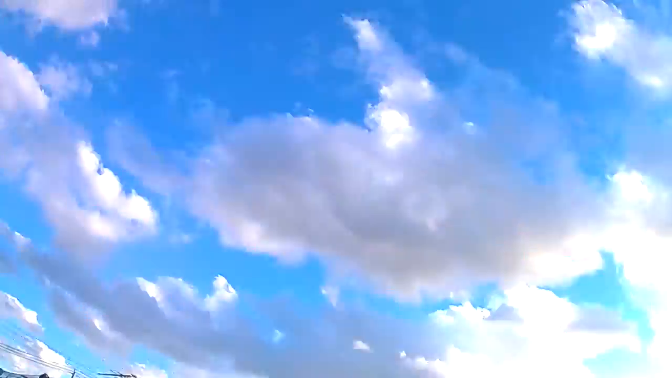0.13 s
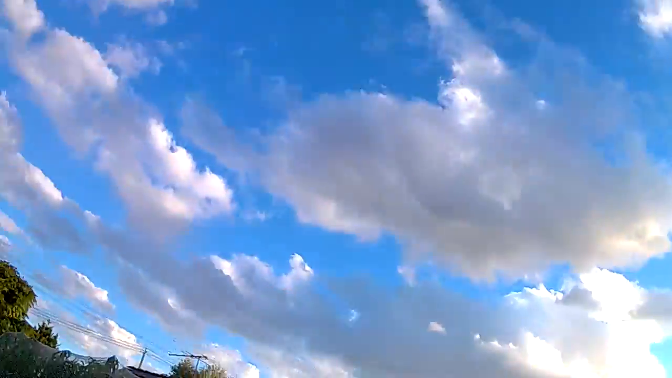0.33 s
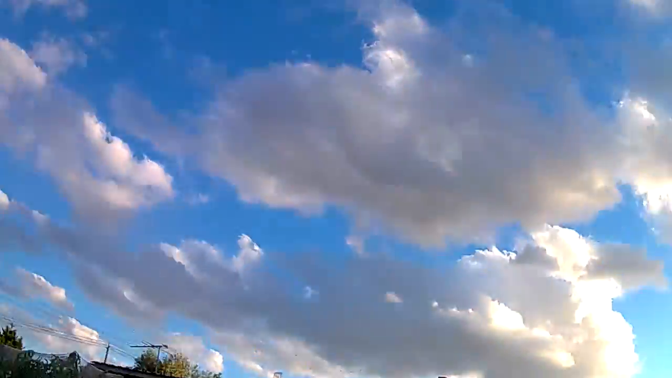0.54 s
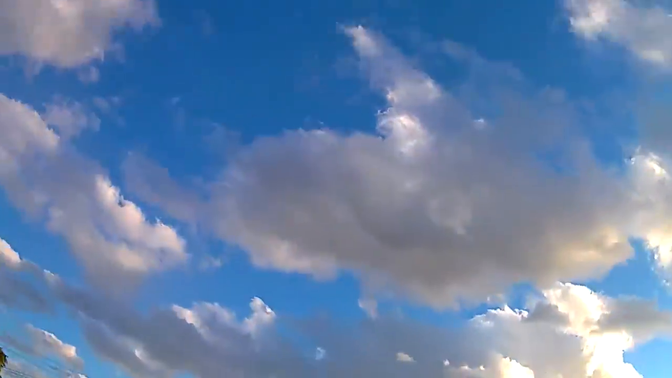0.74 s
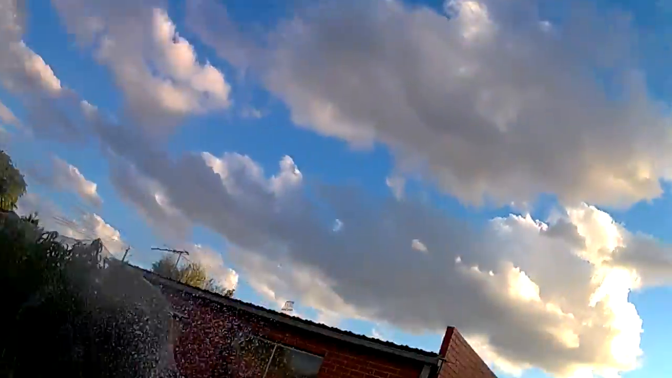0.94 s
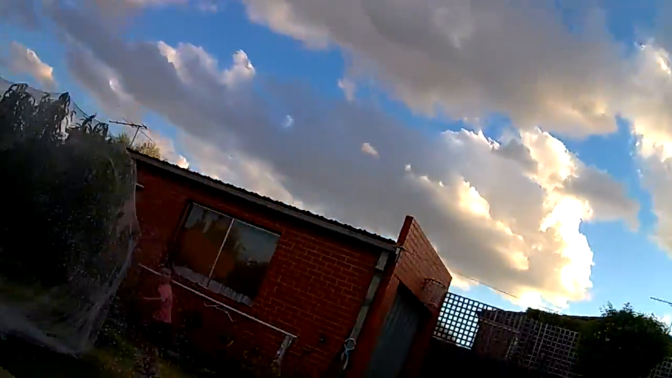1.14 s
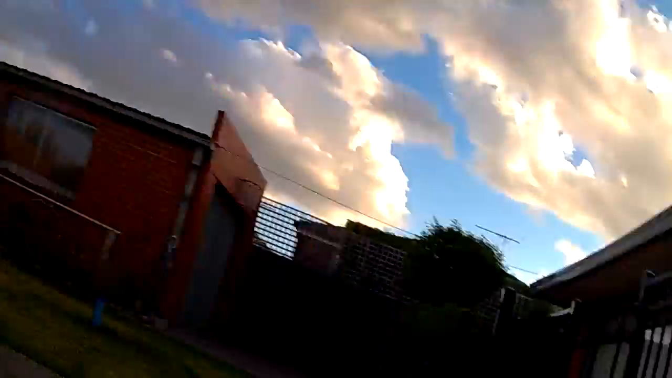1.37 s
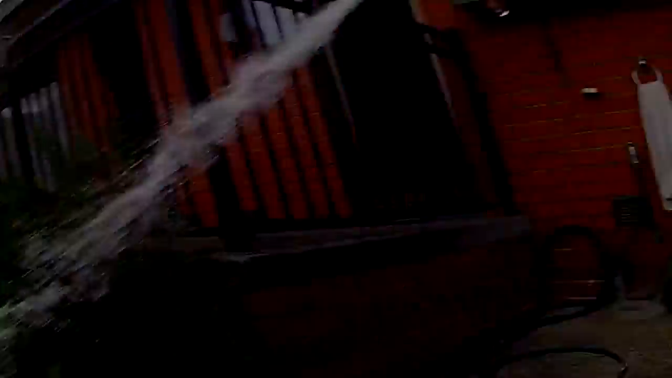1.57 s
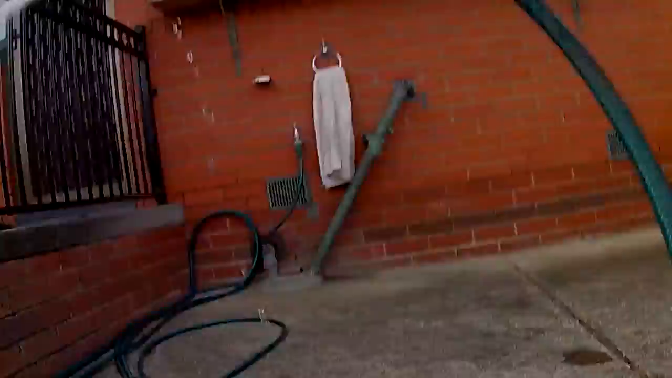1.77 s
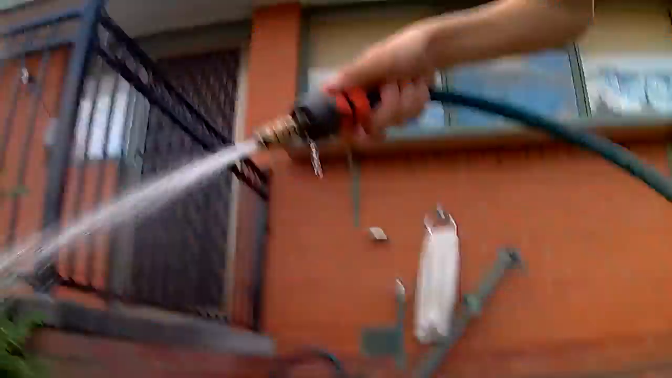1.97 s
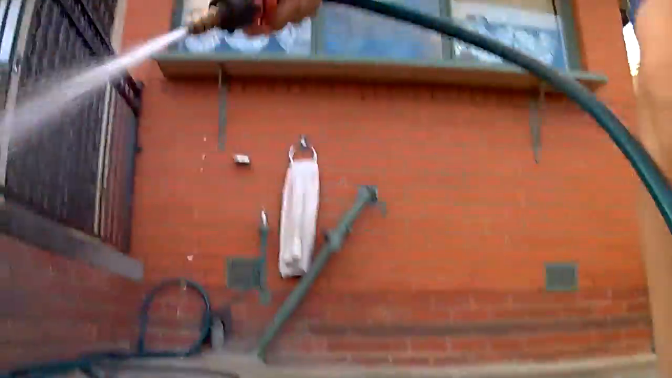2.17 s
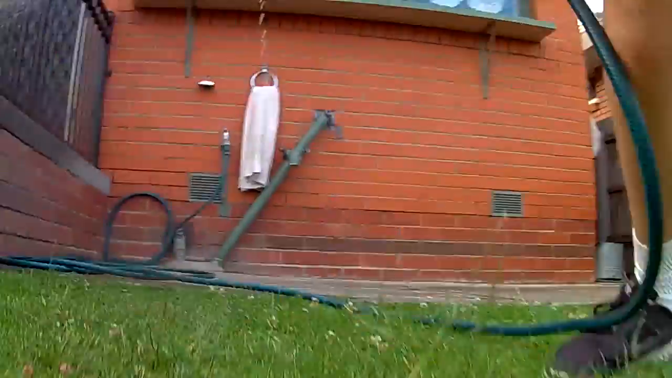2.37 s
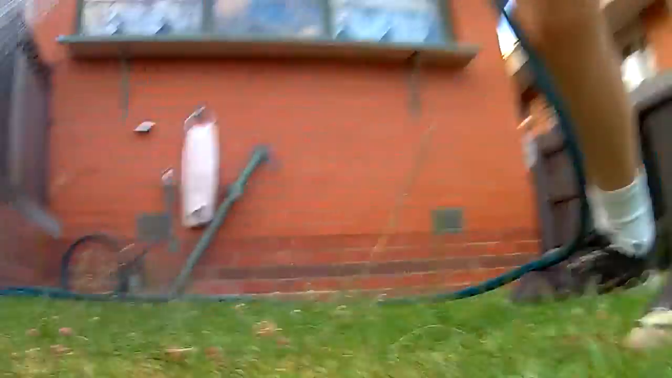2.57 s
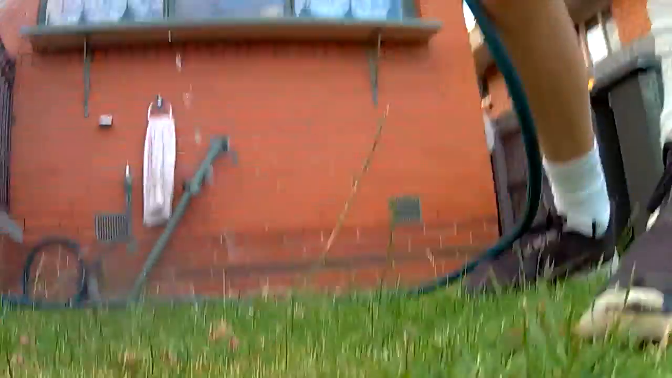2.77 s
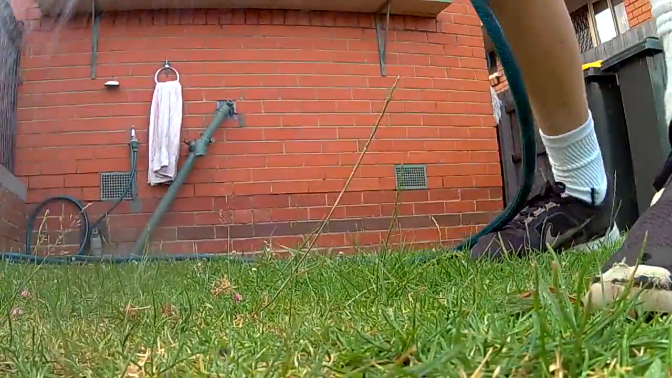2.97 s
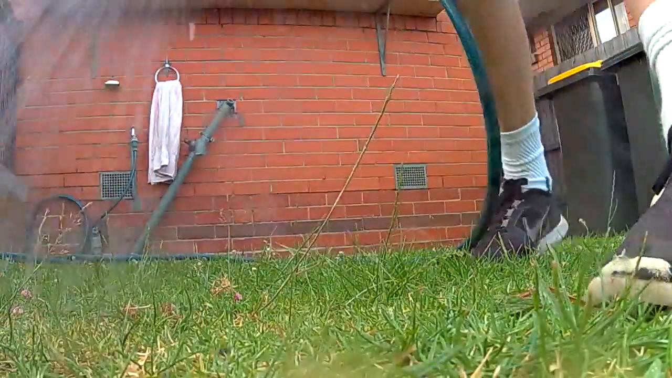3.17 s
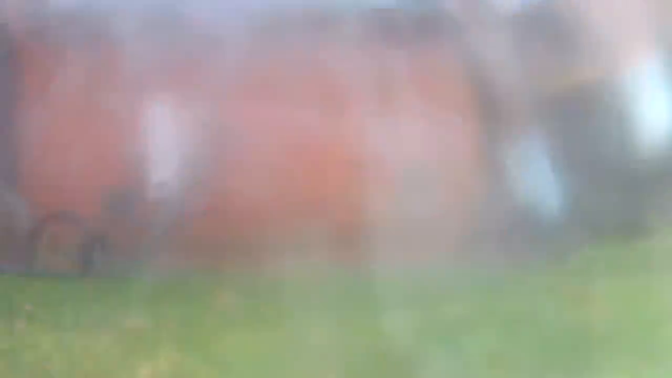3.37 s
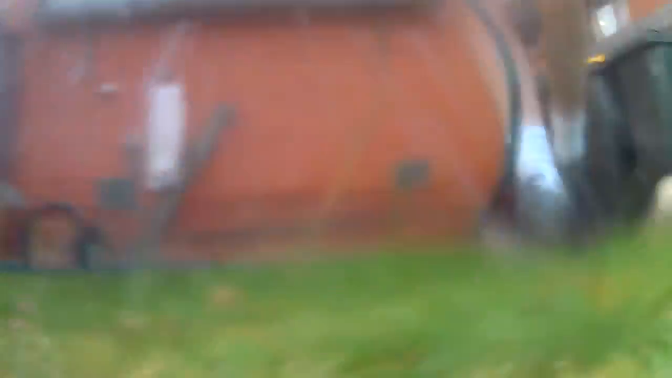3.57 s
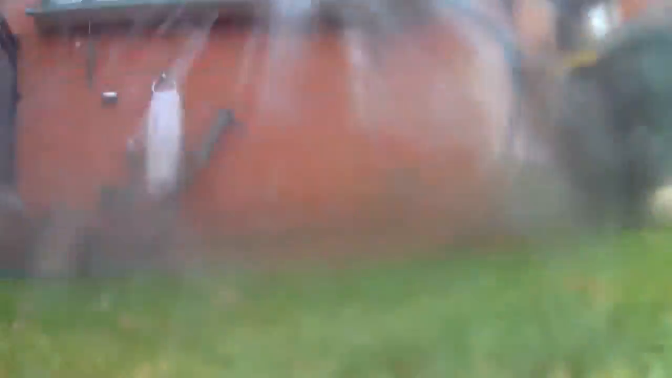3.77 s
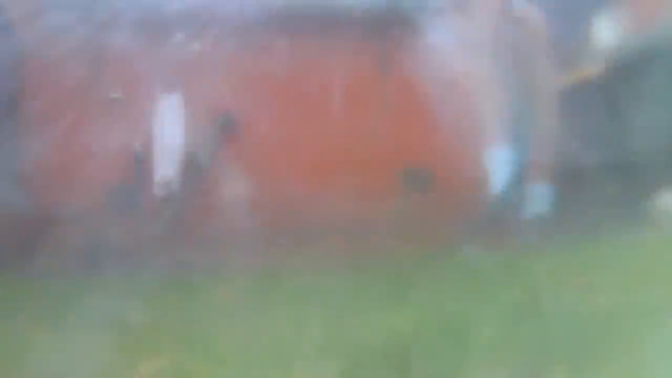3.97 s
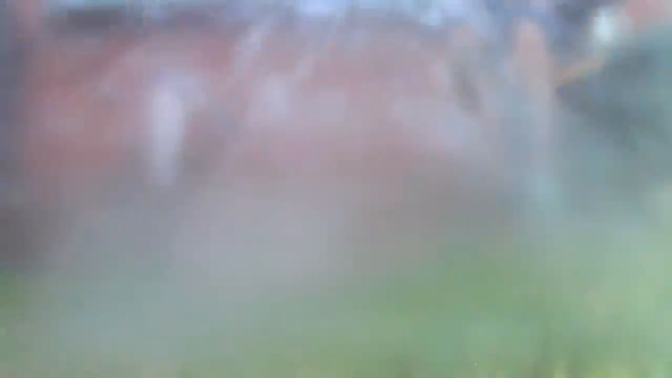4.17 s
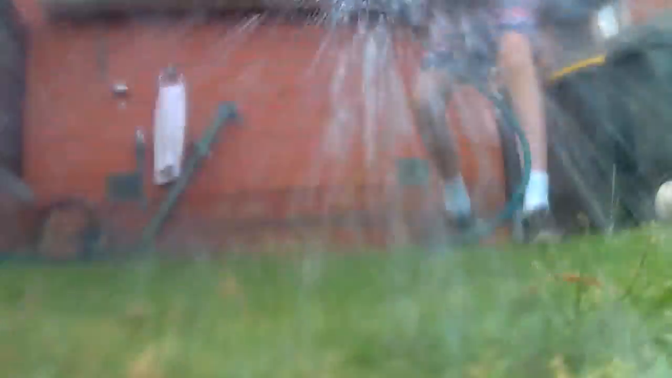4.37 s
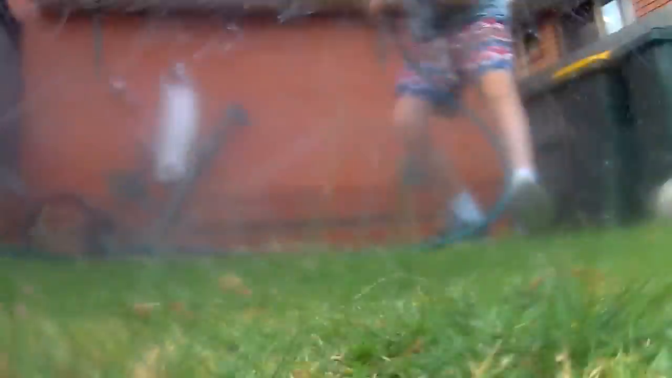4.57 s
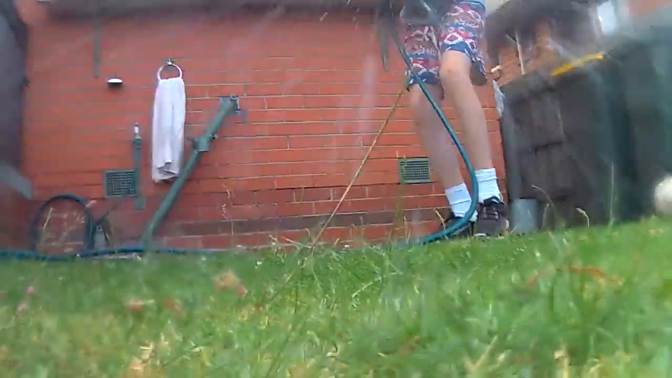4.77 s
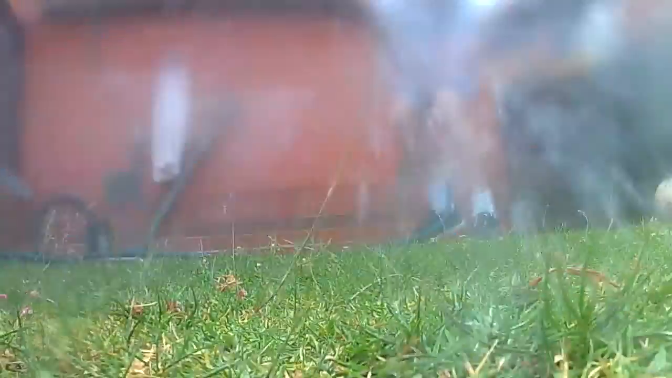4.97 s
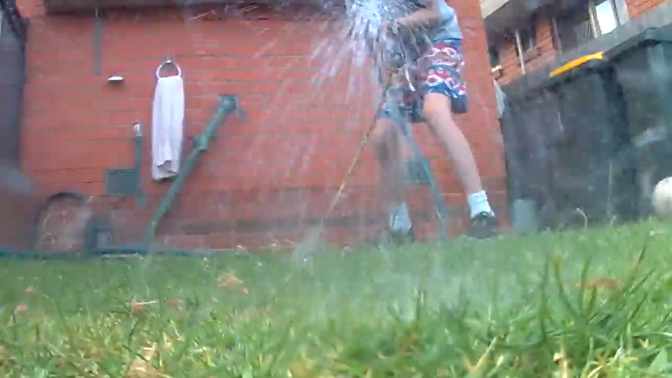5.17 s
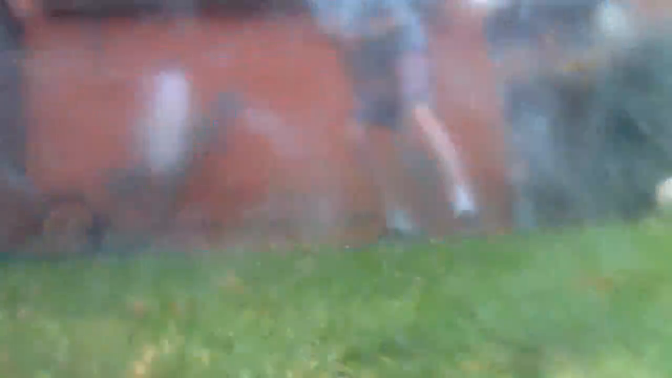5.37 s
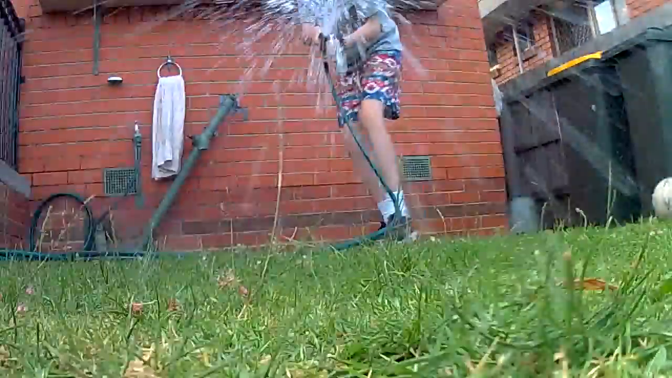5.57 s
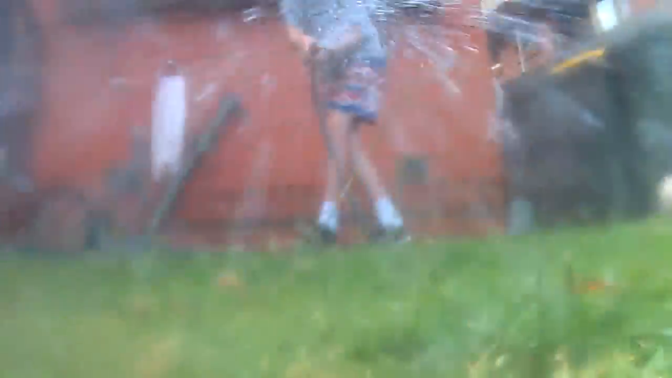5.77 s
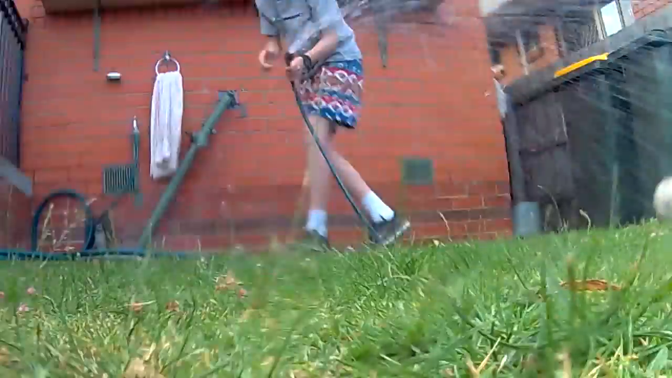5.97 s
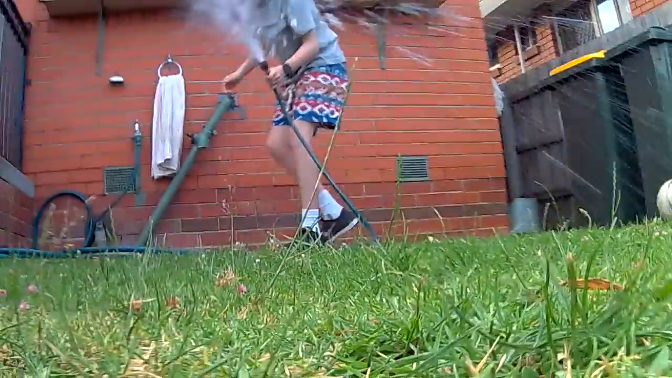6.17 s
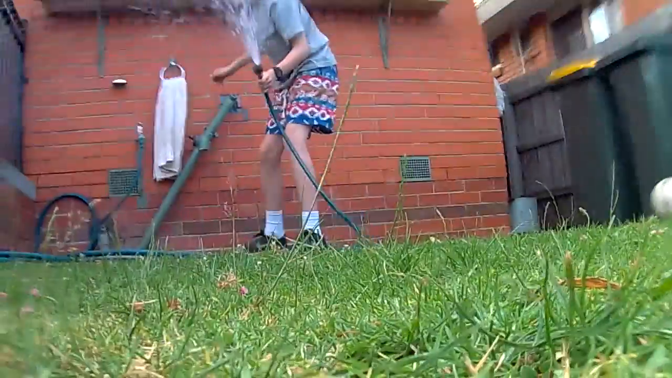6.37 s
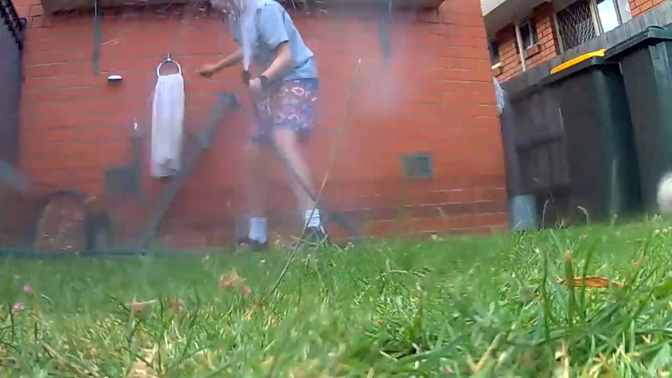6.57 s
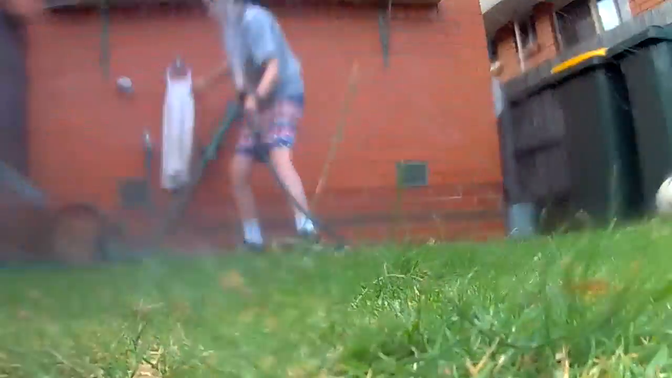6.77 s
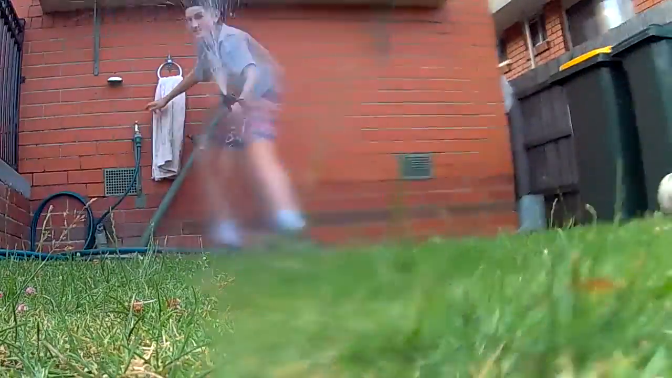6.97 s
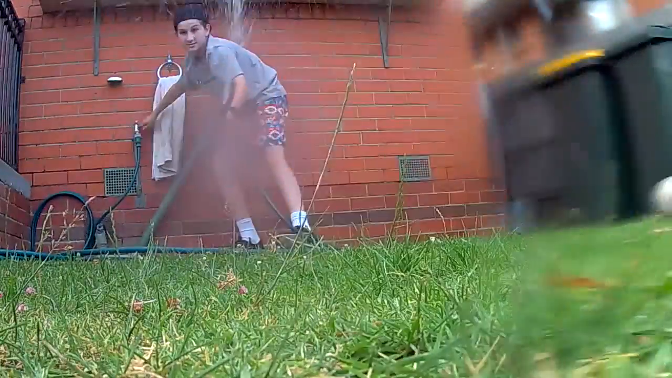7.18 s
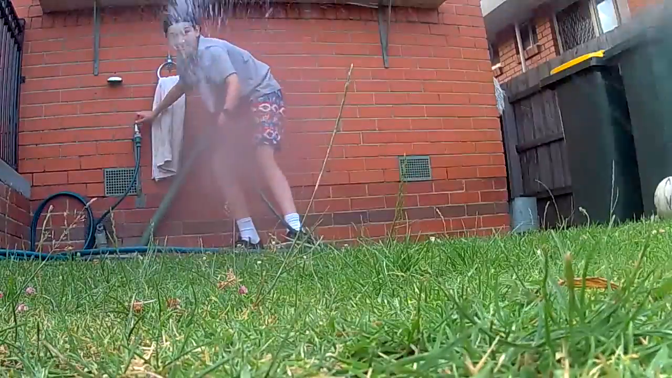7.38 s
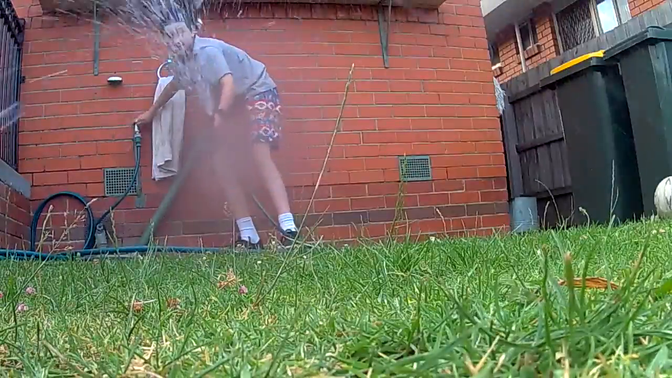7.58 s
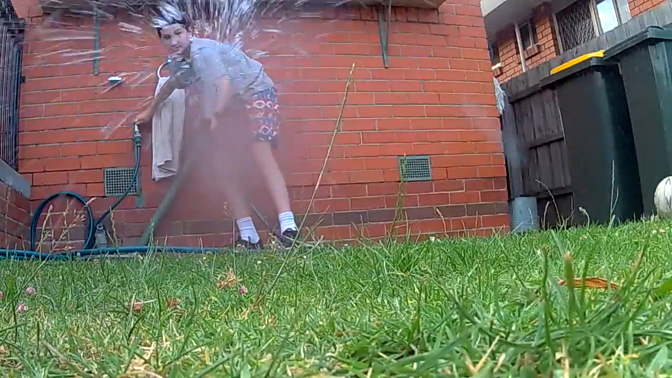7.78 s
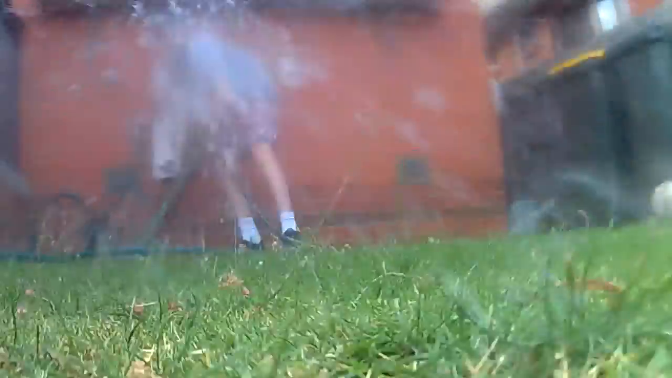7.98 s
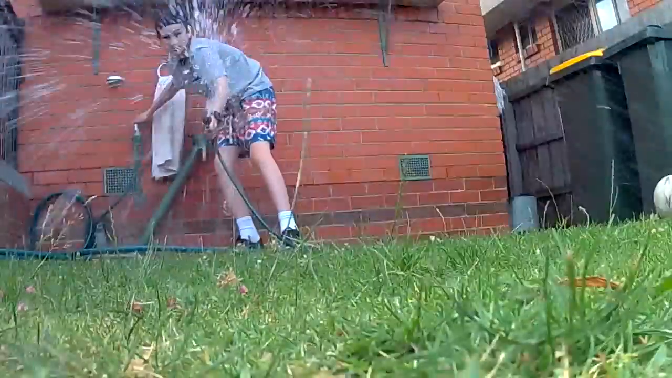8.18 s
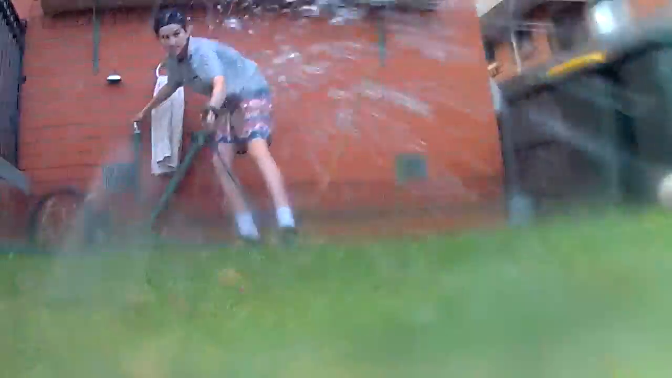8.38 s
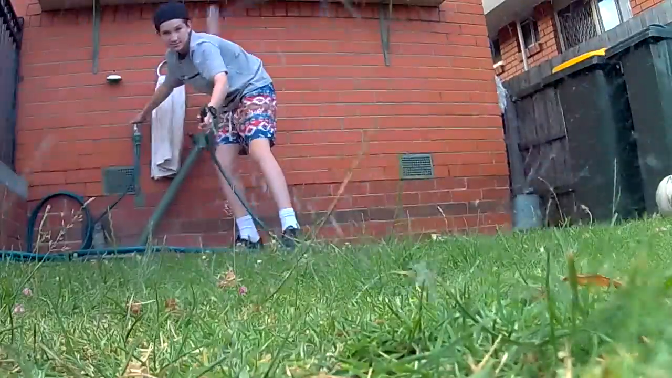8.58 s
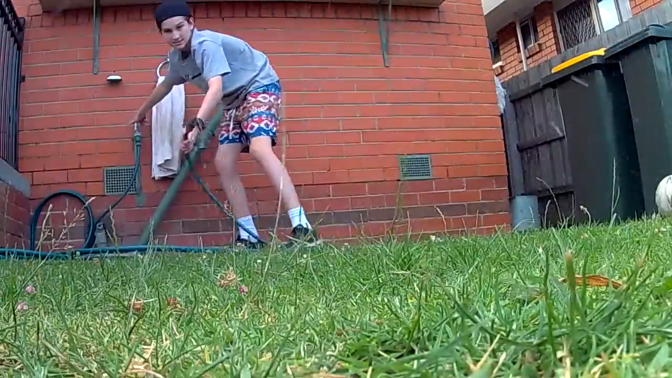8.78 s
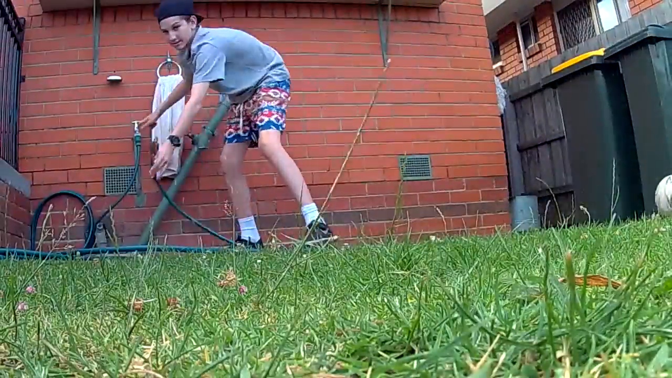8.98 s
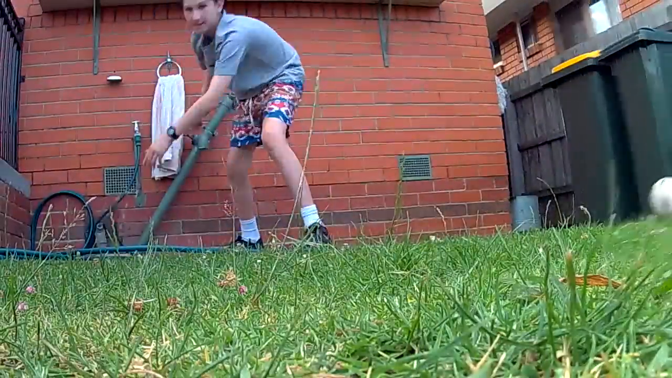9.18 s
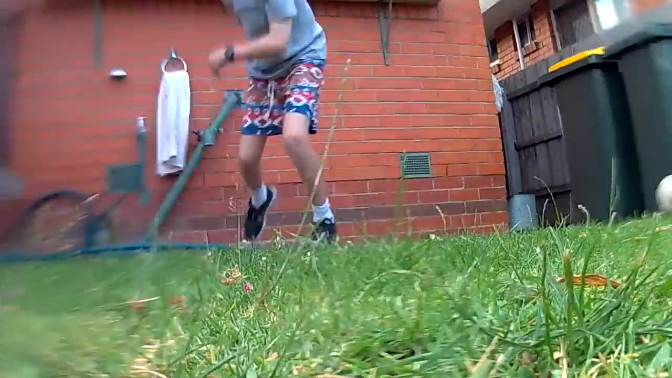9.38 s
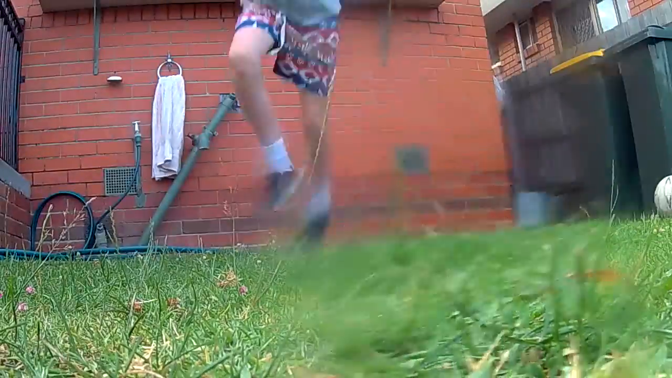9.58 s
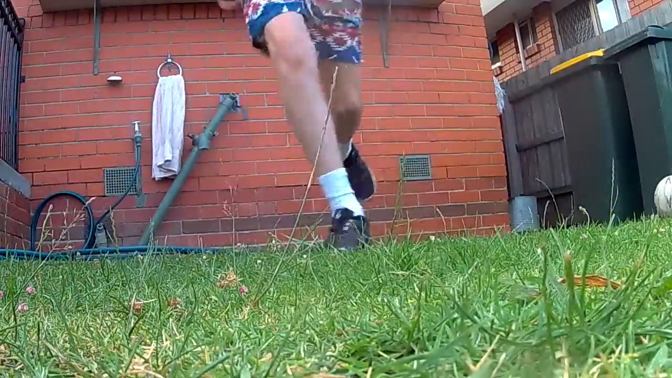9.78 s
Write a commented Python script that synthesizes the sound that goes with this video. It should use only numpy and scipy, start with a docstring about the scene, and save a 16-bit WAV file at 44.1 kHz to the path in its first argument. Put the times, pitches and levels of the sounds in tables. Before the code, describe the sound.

A garden hose hisses near a handled microphone, then blasts it with loud spray, followed by bursts of spattering drops.

```python
"""A yard, heard from one microphone inside a small camera's plastic housing. The camera is carried along,
rumbling and knocking in the hand, while a garden hose hisses nearby; grass blades tap it as it is set
down at 2.4 s. From 3.1 s the jet hits the housing: a dense spray that overloads the microphone.
From 4.5 s come sweeps of separate drops, each ringing the shell for a few milliseconds, until the tap
is shut near 8.5 s and only faint drips are left."""
import sys
import numpy as np
from scipy import signal
from scipy.fft import rfft, irfft, next_fast_len
from scipy.io import wavfile
from scipy.ndimage import uniform_filter1d, map_coordinates

SR = 44100
rng = np.random.default_rng(int(sys.argv[2]) if len(sys.argv) > 2 else 0)


def wav_record(signal):
    """Record a signal, one row per channel, as 16-bit PCM in the file named by sys.argv[1]."""
    frames = np.transpose(np.atleast_2d(signal))
    bounded = np.clip(frames, -1, 1)
    # unit amplitude maps onto the largest positive 16-bit level
    quanta = np.round(bounded * 32767).astype(np.int16)
    wavfile.write(sys.argv[1], SR, quanta)


N = 433062

# the jet swings onto the housing, stays, wavers and slides off: time_s, level_db
DIRECT_SPRAY = [(2.8, -69), (3.0, -49), (3.14, -29), (3.19, -23), (3.22, -9), (3.4, -8), (3.49, -20),
                (3.6, -10), (3.66, -13.5), (3.72, -8.5), (3.92, -11.5), (4.0, -8.5), (4.2, -9.5),
                (4.27, -20), (4.42, -22), (4.5, -40), (4.56, -59.5)]


def amp(db):
    """Gain of a level in dB."""
    return 10 ** (np.asarray(db) / 20)


def unit(x):
    """x at rms 1."""
    return x / np.sqrt(np.mean(x ** 2) + 1e-20)


def curves(rows, off_db=-120):
    """One value per sample for each column after the time; off_db outside the rows."""
    times, *columns = np.transpose(rows)
    return [np.interp(np.arange(N) / SR, times, column, left=off_db, right=off_db) for column in columns]


def wobble(rate):
    """A smooth random curve, rate knots a second."""
    return map_coordinates(rng.standard_normal(int(N * rate / SR) + 4), [np.arange(N) * rate / SR])


def filtered(x, response):
    """x through a filter given as a complex response of frequency in Hz."""
    size = next_fast_len(N + SR // 2)
    return irfft(rfft(x, size) * response(np.fft.rfftfreq(size, 1 / SR)), size)[..., :N]


def rush(spectrum, patchy_db):
    """Coloured noise of rms 1 with patches of random gain in time and frequency."""
    bins = signal.stft(rng.standard_normal(N), nperseg=512)[2]
    patches = uniform_filter1d(rng.standard_normal(bins.shape), size=4, axis=0)
    patches = uniform_filter1d(patches, size=45, axis=1)
    noise = signal.istft(bins * amp(patchy_db * unit(patches)), nperseg=512)[1][:N]
    hz, db = np.transpose(spectrum)
    return unit(filtered(noise, lambda f: amp(np.interp(np.log(f + 1), np.log(hz + 1), db))))


def noise_floor():
    """The yard's murmur of air, the microphone's own noise, a faint whine and a buzz of the electronics."""
    air_spectrum = [(9, -44), (15, -11), (60, -4.5), (150, -9), (600, -19.5), (1100, -21), (3000, -25),
                    (6000, -26.5), (15800, -26.5)]  # yard and microphone noise: frequency_hz, relative_db
    whine_tones = [(7903, -89), (7935, -87), (7962, -93.5)]  # faint steady tones: pitch_hz, rms_db
    air_db, buzz_db, buzz_hz = -65, -72, 30.3
    phase_per_hz = 2 * np.pi * np.arange(N) / SR
    whine = sum(amp(db + 1.5 * wobble(6)) * np.sqrt(2) * np.sin(hz * phase_per_hz)
                for hz, db in whine_tones)
    buzz = sum(amp(buzz_db - 4.5 * np.log2(k) + 2.5 * wobble(3)) * np.sin(k * buzz_hz * phase_per_hz)
               for k in range(1, 23))
    return amp(air_db) * rush(air_spectrum, patchy_db=-1.5) + whine + buzz


def hose_hiss():
    """The free jet hisses nearby; as the camera turns, a reflection of changing delay colours the top."""
    hiss_levels = [(0, -57.5, -59.5), (0.6, -56.5, -59.5), (0.8, -61, -64), (1.3, -63.5, -64),
                   (1.6, -62.5, -71), (2.2, -71, -70), (2.6, -57, -65), (3, -55, -60.5), (3.1, -40, -48)]  # the jet heard through the air: time_s, lower_db, upper_db
    lower_spectrum = [(590, -63), (1000, -22.5), (1280, -11.5), (1410, -22), (1520, -36.5), (1880, -23.5),
                      (2380, -30.5), (2910, -4), (3100, 2.5), (3290, -2), (3520, -9.5), (4070, -0.5),
                      (5800, -17), (7540, -45.5), (12800, -120)]  # lower band of the hiss: frequency_hz, relative_db
    upper_spectrum = [(3060, -30.5), (5200, -9), (6640, -5), (7220, -12), (9130, -13.5), (10200, -7.5),
                      (11600, -21.5), (12600, -9), (15000, -25.5)]  # upper band of the hiss: frequency_hz, relative_db
    lower_db, upper_db = curves(hiss_levels)
    upper = amp(upper_db) * rush(upper_spectrum, patchy_db=5.0)
    delay_s = 0.00047 + 0.00004 * wobble(3.5)
    reflection = 0.25 * map_coordinates(upper, [np.arange(N) - SR * delay_s])
    lower = amp(lower_db) * rush(lower_spectrum, patchy_db=1.5)
    return upper + reflection + lower


def handling():
    """Grip rumble, and dull knocks that ring the housing's back door and shove the microphone."""
    grip_levels = [(0, -48.5), (0.25, -45.5), (0.45, -51), (1.05, -51), (1.27, -37.5), (1.45, -43),
                   (1.65, -42.5), (1.92, -48), (2.15, -44), (2.38, -45), (2.5, -34), (2.62, -43),
                   (2.72, -73), (2.9, -76)]  # the hand that carries the camera: time_s, level_db
    grip_spectrum = [(7.1, -38), (12, -2), (27, -0.5), (40, -7.5), (153, -32), (182, -38.5), (300, -40.5),
                     (390, -84), (660, -120)]  # its rumble: frequency_hz, relative_db
    door_modes = [(412, -5.5, 0.0066), (1248, 4.5, 0.0049), (3097, -8, 0.007), (5050, -18, .008),
                  (7520, -41, 0.0051)]  # ring of the back door: pitch_hz, relative_db, t60_s
    knocks = [(1.05, -54, -49, 90), (1.07, -45.5, -38, 93), (1.205, -48.5, -48, 94),
              (1.248, -52, -33.5, 70), (1.42, -27.5, -46, 60), (1.4252, -8, -4.5, 98),
              (1.479, -31.5, -58, 122), (1.806, -35.5, -17.5, 62), (2.454, -41, -19.5, 24.6),
              (2.674, -31, -52, 60)]  # knocks on the shell: start_s, crack_db, thump_db, thump_hz
    rumble = unit(amp(4.5 * wobble(18)) * rush(grip_spectrum, patchy_db=-1.5))
    sound = amp(curves(grip_levels)[0]) * rumble
    t = np.arange(SR // 5) / SR
    door = sum(amp(db - 60 * t / t60) * np.sin(2 * np.pi * hz * t) for hz, db, t60 in door_modes)
    for start_s, crack_db, thump_db, thump_hz in knocks:
        envelope = (1 - np.exp(-t / 0.0014)) * amp(-13 * t * thump_hz)  # dies by 13 dB a cycle
        thump = envelope * np.sin(2 * np.pi * thump_hz * t + 1.2)
        sound[round(start_s * SR):][:len(t)] += amp(crack_db) * door + amp(thump_db) * thump
    return sound


def shell(force):
    """Four forces drive the housing's bass, low, middle and high modes; each group passes unit energy."""
    shell_modes = [(275, 860, -3), (1077, 560, 3.5), (1518, 240, 5.5), (1925, 330, 3), (2717, 310, -6.5),
                   (3167, 189, -2.5), (3840, 360, -3.5), (4297, 420, -6), (5770, 680, 2), (8700, 2500, -9),
                   (10250, 1000, -5), (13500, 4000, -16.5)]  # broad modes of the plastic: pitch_hz, width_hz, relative_db
    lingering_modes = [(474, 8, -4), (1528, 24, 1), (2546, 11, -12), (3195, 60, -11)]  # slowly dying modes: pitch_hz, width_hz, relative_db

    def response(f):
        groups = np.zeros((4, len(f)), complex)
        for k, (hz, width, db) in enumerate(shell_modes + lingering_modes):
            group = np.searchsorted([1300, 2400, 5000], hz)
            resonance = 1j * f * width / (hz * hz - f * f + 1j * f * width)
            groups[group] += (-1) ** k * amp(db) * resonance
        return groups / np.sqrt(np.mean(np.abs(groups) ** 2, axis=1, keepdims=True))
    return filtered(force, response).sum(axis=0)


def pushes(start_s, gains, decay_s):
    """A blade or a flattening drop pushes the shell with a ragged burst; one gain column per mode group."""
    t = np.arange(256) / SR
    bursts = rng.standard_normal((len(start_s), len(t))) * np.exp(-t / decay_s)
    bursts /= np.linalg.norm(bursts, axis=1, keepdims=True)
    samples = (np.round(start_s * SR).astype(int)[:, None] + np.arange(len(t))).ravel()
    return np.array([np.bincount(samples, (bursts * gain[:, None]).ravel(), N + SR)[:N]
                     for gain in gains.T])


def contact_db():
    """Level of all small contacts on the housing: direct spray, strays and short showers add in power."""
    strays = [(2.42, -58), (4.8, -56.5), (5.05, -55.5), (5.19, -46), (5.9, -61), (6.1, -72), (6.25, -52),
              (6.8, -55), (7.25, -69), (7.45, -61.5), (8.45, -59.5), (8.58, -76), (9.2, -75.5), (9.82, -78)]  # stray contacts, droplets between the sweeps, last drips: time_s, level_db
    # grass blades as the camera is set down, then each sweep: start_s, hold_s, level_db, fall_db_per_s
    showers = [(2.429, 0.025, -36, 298), (2.674, 0.011, -45.5, 204), (4.599, .1, -24, 597),
               (4.854, 0.067, -30, 320.5), (5.206, .08, -22, 161.5), (5.49, .2, -21.5, 189.5),
               (6.125, 0.028, -31, 204), (7.554, 0.0073, -40, 500), (7.616, .015, -38, 500),
               (7.715, .08, -26, 302), (7.89, .17, -27, 120), (8.168, 0.1, -41.5, 150)]
    rise_db_per_s = 5000
    t = np.arange(N) / SR
    power = amp(curves(DIRECT_SPRAY)[0]) ** 2 + amp(curves(strays)[0]) ** 2
    for start_s, hold_s, level_db, fall_db_per_s in showers:
        onset_db = rise_db_per_s * np.maximum(start_s - t, 0)
        fade_db = fall_db_per_s * np.maximum(t - start_s - hold_s, 0)
        power += amp(level_db - onset_db - fade_db) ** 2
    return 10 * np.log10(power)


def sharp_taps():
    """Force of sharp taps on the housing; where one lands decides which modes it favours."""
    # grass blades as the camera is set down, then water drops: start_s, low_modes_db, upper_modes_db
    taps = [(2.4358, -12.5, -10), (2.446, -16, -14), (2.6186, -24, -19.5), (2.6744, -34, -16.5),
            (2.915, -19, -16), (2.9408, -11.0, -14), (2.9602, -21, -16.5), (2.9935, -21, -14.5),
            (3.0699, -7, -4), (3.0755, 0, -5.5), (3.1038, -16, -8.5), (4.3074, 8.5, 12), (4.314, 20, 8),
            (4.3345, 20.5, 13), (4.3581, 13, 12.5), (4.3696, 13, 11), (4.3997, 8, 12), (4.4192, 12.5, 9.5),
            (4.4346, 3, 4), (4.5156, -10, -5), (4.5515, -0.5, -12), (4.5768, 0.5, 0.0), (4.5979, 1, 1.5),
            (4.604, 2, 4.5), (4.62, 11.5, 9.5), (4.6459, 9.5, 5.5), (4.6555, 4, 11), (4.68, -12, 3.0),
            (4.6972, -1, 1), (4.8505, 6.0, 5.5), (4.8637, 7.5, 9.5), (4.869, 13.5, 15), (4.8865, 1.0, 1.0),
            (4.9094, 11.5, 3), (5.1976, 1, 4.5), (5.2141, 12, 12), (5.222, 13, 12.5), (5.2344, 19.5, 6.5),
            (5.268, 10, 6.5), (5.2827, 8, 0.5), (5.3396, -19, 2.0), (5.3911, -16, -4), (5.423, -5.0, -5.0),
            (5.4378, -2, 3), (5.485, 10, 8.5), (5.5094, 15.5, 11.5), (5.5291, 2, 1.5), (5.5424, 12.5, 7.5),
            (5.5579, -9, 5.5), (5.6043, 12, 5.5), (5.636, 10, 9.5), (5.6435, 12.0, 6.0), (5.6634, 9.5, 4.5),
            (5.6792, 8.0, 7), (5.6925, 7.5, 7.5), (5.7126, -14, -1.5), (5.7457, -15, -2),
            (5.7688, -6, -2.5), (5.8241, -6.5, -5.0), (5.8822, -16, -17.5), (5.916, -18.5, -22.5),
            (5.922, -19, -17.0), (5.9733, -20.5, -27.5), (6.0346, -30, -29), (6.1273, 6, 0),
            (6.1318, 3, 7.5), (6.147, -2.0, -2), (6.1597, -16, 0.5), (6.177, -25, -9), (6.2427, -15, -9),
            (6.2912, -24, -17.5), (6.3328, -15, -15), (6.3613, -35, -26.5), (6.3861, -20, -25),
            (6.4362, -3.5, -2.5), (6.461, 0.0, 4), (6.5768, -20, -19), (6.6242, -18.0, -10.0),
            (6.6379, -9.0, -13), (6.6671, -3.5, -17.5), (6.7585, -14, -11), (6.7742, -19, -17),
            (6.8559, -39, -30), (6.8939, -21, -22.5), (6.936, -16, -22.0), (7.001, -2.5, 0),
            (7.1258, -29.5, -14), (7.245, -29, -32.5), (7.287, -10.5, -20.5), (7.3822, -34, -27.5),
            (7.4208, -25, -31), (7.4487, -19, -20), (7.471, -16, -15.5), (7.5076, 0, -7),
            (7.5517, -2, -11.5), (7.5581, -0.5, -3.5), (7.5705, -8, -6.5), (7.6114, -1, -1.5),
            (7.6181, 1.5, 2), (7.6327, -17, -5.5), (7.69, -20, -19.5), (7.7229, 2, -6.0), (7.7577, 2, 4),
            (7.7738, 3, 5), (7.7881, 7.5, 9.5), (7.7986, 5, -1.5), (7.8501, 15.5, 3), (7.8738, 5.5, 8.5),
            (7.8928, 11, 9.0), (7.9042, 2, 4), (7.9452, 2.5, 1), (7.9645, 6.5, 3.0), (7.9924, -0.5, 5),
            (8.0109, 4.0, 8.0), (8.0292, 4, 6), (8.0418, 9, 6.5), (8.0708, 6.5, 5), (8.0904, 1, -5),
            (8.1594, -3.5, -4.5), (8.171, 9.5, 5), (8.1893, -6, 7), (8.2011, -7.0, -6.5),
            (8.2209, -3.0, 0.5), (8.2371, -0.5, -1.0), (8.246, -7, 2.5), (8.2616, -0.5, 0),
            (8.2777, 6.0, 4.5), (8.3, -14.0, -11.0), (8.3161, 1.5, 1.5), (8.3499, -6, -9.5),
            (8.3959, -22, -15.5), (8.4088, -9, -13), (8.4522, -14.5, -9.5), (8.5136, -5.5, -12),
            (9.0932, -42, -50), (9.1637, -50, -40), (9.254, -47.5, -42), (9.4154, -32.5, -44),
            (9.4542, -49, -41)]
    start_s, low_db, upper_db = np.transpose(taps)
    chance = rng.standard_normal((len(start_s), 2))
    bass_db = low_db - 9.0 + 3 * chance[:, 0]
    high_db = 1.086 * upper_db - 8.5 + 4.8 * chance[:, 1]  # light taps are duller than hard ones
    return pushes(start_s, amp(np.transpose([bass_db, low_db, upper_db, high_db])), decay_s=0.0013)


def patter(tap_force):
    """Force of countless small contacts: grass, then spray and mist; each sharp tap trails a few more."""
    level_db = contact_db()
    trail = signal.lfilter([1], [1, -np.exp(-1 / (0.007 * SR))], np.sum(tap_force ** 2, axis=0))
    level = np.sqrt(amp(level_db) ** 2 + amp(-85) * np.abs(trail))
    heavy = np.clip((level_db + 30) / 15, 0, 1)
    dripping = np.arange(N) / SR > DIRECT_SPRAY[-1][0]  # afterwards: fewer, more uneven drops
    base_rate = 330 - 110 * dripping + 1500 * heavy  # a heavier jet lands more drops a second
    hits = np.flatnonzero(rng.random(N) < base_rate / SR * amp(2.5 * wobble(60)))
    chance = rng.standard_normal((len(hits), 5))  # one draw for size, one for each mode group
    size_spread_db = 4.08 + 1.6 * (dripping * (1 - heavy))[hits, None]
    hit_db = size_spread_db * chance[:, :1] + 3.97 * chance[:, 1:] + [-14, -6, -6, -15.5]
    hit_db[:, 3] += 2.3 * heavy[hits]  # fast drops snap brighter
    gains = amp(hit_db) * level[hits, None] * np.sqrt(SR / base_rate[hits, None])
    light = np.clip((-18.5 - level_db) / 25, 0, 1)
    faint = np.clip((-49 - level_db) / 12, 0, 1)
    mist_db = (7 - 4 * dripping) * light - 5 * dripping * faint  # misty showers, drier strays
    mist = amp([[-28], [-14], [-13], [-22]]) * amp(mist_db) * level * rng.standard_normal((4, N))
    return pushes(hits / SR, gains, decay_s=0.00089) + mist


def grass_and_water():
    """Sharp taps and patter ring the same shell, right around the microphone."""
    tap_force = sharp_taps()
    return shell(tap_force + patter(tap_force))


def scene():
    """Everything reaches one microphone inside the housing."""
    return (grass_and_water() + hose_hiss() + handling() + noise_floor())[None]


def record(dry):
    """Loud drops overload the input stage; nothing is kept above the band limit."""
    ceiling, hardness, top_hz = 0.73, 7, 15780
    clipped = dry / (1 + np.abs(dry / ceiling) ** hardness) ** (1 / hardness)
    return filtered(clipped, lambda hz: hz < top_hz)


dry = scene()
out = record(dry)
wav_record(out)
```